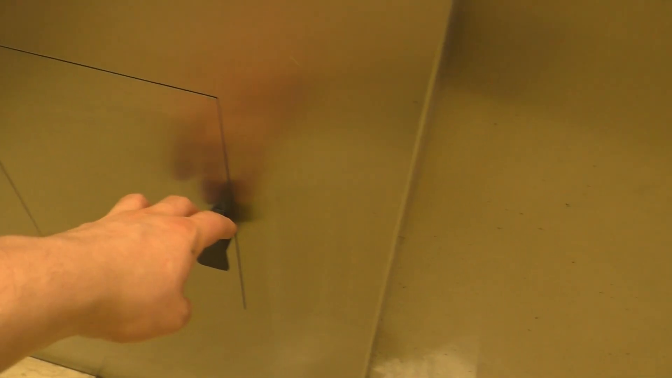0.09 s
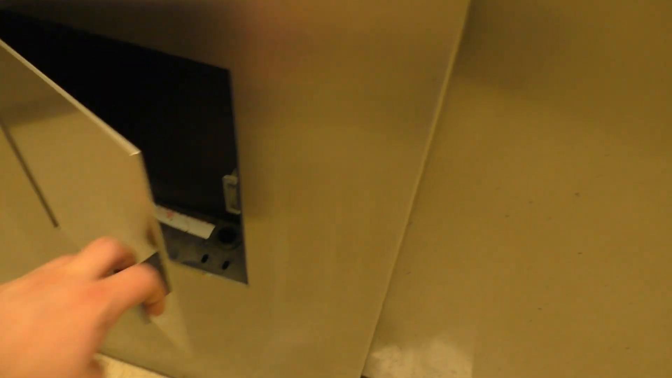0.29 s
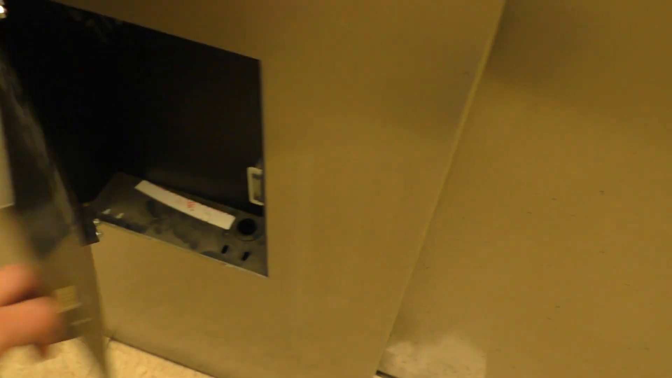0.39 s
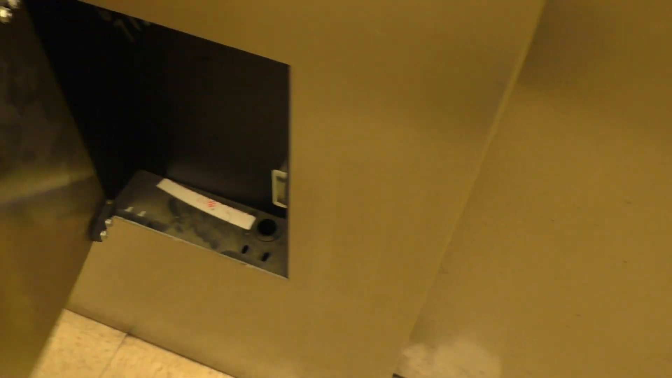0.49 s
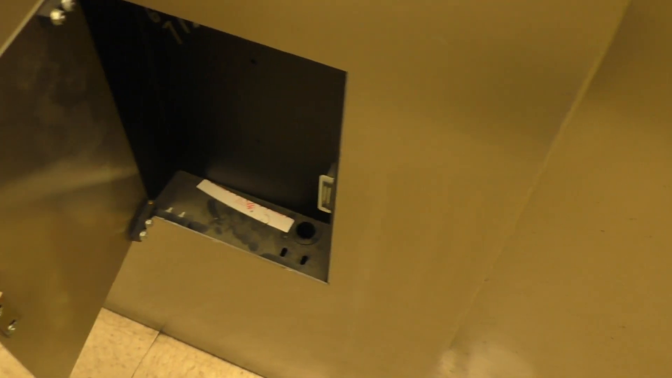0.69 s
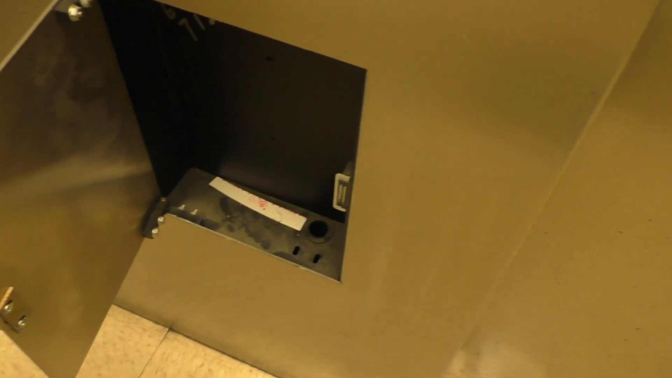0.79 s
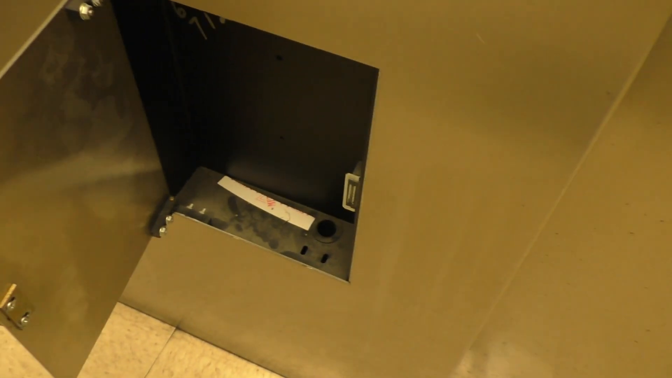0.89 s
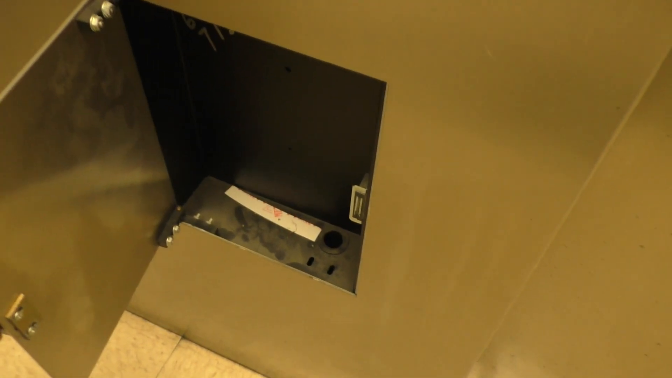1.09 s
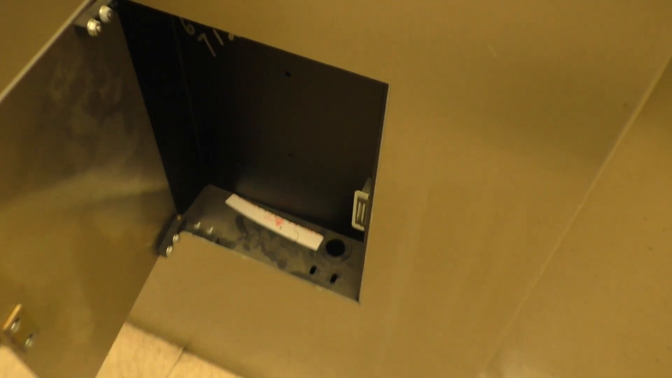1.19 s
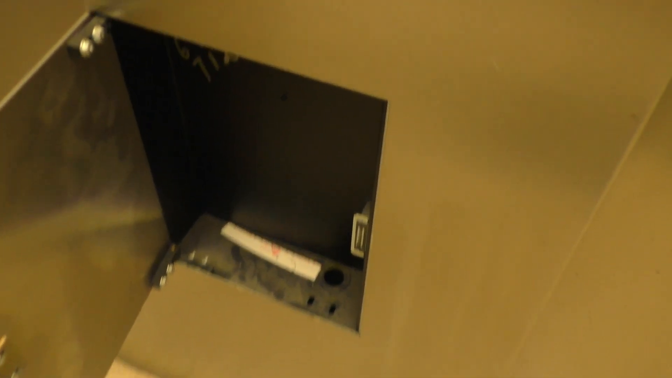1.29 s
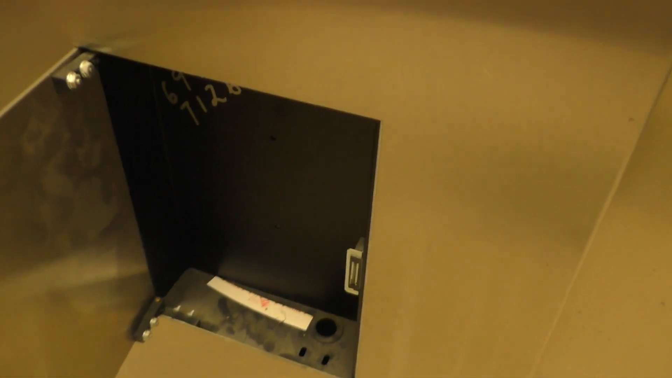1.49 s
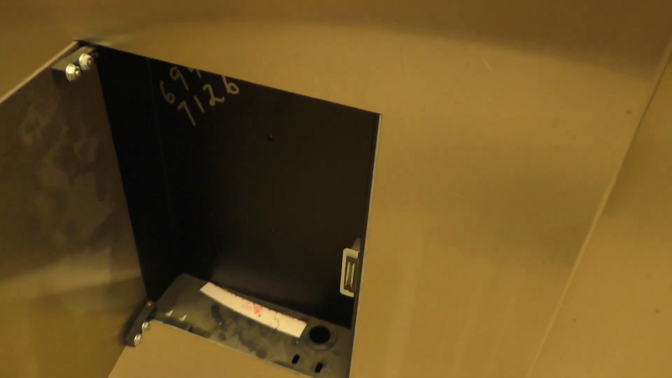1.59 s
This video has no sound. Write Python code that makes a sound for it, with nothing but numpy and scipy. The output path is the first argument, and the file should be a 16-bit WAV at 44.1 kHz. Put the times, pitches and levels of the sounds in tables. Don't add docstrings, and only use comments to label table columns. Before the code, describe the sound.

Close hand-held stereo inside a small steel elevator car: faint hand rub, catch click, one heavy sheet-metal bang with rapid slaps, a boomy rebound, a sharp clack, then ringing fades into quiet machine hum.

```python
import sys
import numpy as np
from scipy import signal
from scipy.fft import rfft, irfft, next_fast_len
from scipy.io import wavfile
from scipy.ndimage import map_coordinates

SR = 44100
rng = np.random.default_rng(int(sys.argv[2]) if len(sys.argv) > 2 else 0)


def to_linear_factor(level_db):
    exponent = np.asarray(level_db, float) / 20
    return 10 ** exponent


def dump(signal):
    limited = np.clip(np.atleast_2d(signal).T, -1, 1)
    pcm = np.round(limited * 32767).astype(np.int16)
    wavfile.write(sys.argv[1], SR, pcm)


N = 70560
T = np.arange(N) / SR


def unit(x):
    return x / np.sqrt(np.mean(x ** 2) + 1e-20)


def along(points, hz):
    f, v = np.transpose(points)
    return np.interp(np.log(hz + 1), np.log(f + 1), v)


def wobble(rate):
    knots = rng.standard_normal(int(N * rate / SR) + 4)
    return map_coordinates(knots, [np.arange(N) * rate / SR])


def add(into, x, s):
    k = round(s * SR)
    into[:, k:] += x[:, :N - k]


def rush(tone, alike, shape=lambda hz, t: 1):
    hz, t, z = signal.stft(rng.standard_normal((2, N)), SR, nperseg=256, noverlap=192)
    z = z * shape(hz[:, None], t)
    pair = signal.istft(z, SR, nperseg=256, noverlap=192)[1][:, :N]
    m = next_fast_len(N + 8192)
    f = np.fft.rfftfreq(m, 1 / SR)
    gain = to_linear_factor(along(tone, f))
    turn = np.arccos(np.clip(along(alike, f), -1, 1)) / 2
    mid, side = irfft(rfft(pair, m) * gain * [np.cos(turn), np.sin(turn)], m)[:, :N]
    return np.array([mid + side, mid - side]) / np.sqrt(np.mean(gain ** 2))


# pitch_hz, left_right_likeness
MODE_ALIKE = [(110, 1), (280, 0.11), (460, .8), (1000, 0.89), (3000, 0.73)]
FLUTTER_DB, FLUTTER_PER_S = 1.5, 15
WANDER, BLUR_HZ = .003, 700


def mode(hz, t60, attack):
    crowd = 1 + hz / BLUR_HZ
    likeness = np.clip(along(MODE_ALIKE, hz), -1, 1)
    turn = np.arccos(likeness) / 2 * np.array([[1], [-1]])
    pitch = hz * (1 + WANDER * wobble(FLUTTER_PER_S * crowd))
    phase = 2 * np.pi * (np.cumsum(pitch) / SR + rng.random())
    flutter_db = FLUTTER_DB * np.sqrt(crowd) * wobble(FLUTTER_PER_S * crowd)
    return to_linear_factor(flutter_db - 60 * T / t60) * (1 - np.exp(-T / attack)) * np.sin(phase + turn)


# pitch_hz, t60_s
RING = [(80, 1.14), (300, 1.2), (1000, 0.93), (3000, 0.56), (8000, 0.59), (15000, 0.24)]
# pitch_hz, rise_s
SWELL = [(100, 0.051), (700, 0.029), (2500, 0.0059), (8000, 0.0016)]
# pitch_hz, left_right_likeness
HIT_ALIKE = [(80, 0.27), (280, 0.41), (600, 0.66), (2000, 0.79), (6000, 0.33), (14000, .4)]
GRAIN_DB, GRAIN_PER_S, GRAIN_FROM_HZ = 1.5, 300, 1500


def blows(hits, tone, modes, ring_db, slower):
    out = np.zeros((2, N))

    def attack(hz):
        return abs(slower) * along(SWELL, hz) + 1e-4

    for s, db, share in hits:
        grain_db = GRAIN_DB * wobble(GRAIN_PER_S)

        def wash(hz, t):
            chatter_db = hz / (hz + GRAIN_FROM_HZ) * np.interp(t, T, grain_db)
            fade_db = chatter_db - 60 * t / (share * along(RING, hz))
            return to_linear_factor(fade_db) * (1 - np.exp(-(t + 0.011) / attack(hz)))

        x = rush(tone, HIT_ALIKE, wash)
        for hz, level_db, t60 in modes:
            x = x + to_linear_factor(ring_db + level_db) * mode(hz, t60 * share, attack(hz))
        add(out, to_linear_factor(db) * x * np.minimum(T / 0.0009, 1), s)
    return out


UNEVEN_DB = 1.5

# pitch_hz, level_db
HUM_TONE = [(12, -21), (20, 0.5), (119, -6.5), (146, -10.5), (256, -17), (325, -21), (363, -21.5),
            (406, -27.5), (900, -29.5), (1170, -54.5), (1980, -120)]
# pitch_hz, left_right_likeness
HUM_ALIKE = [(30, 0.15), (200, 0.59), (900, 0.79)]
# pitch_hz, level_db
HISS_TONE = [(290, -17), (500, 8), (570, -4), (1890, -11.5), (11300, -12.5), (15800, -8.5), (16500, -39)]
# pitch_hz, level_db
WHINE = [(253.0, -64), (360.7, -63.5), (10966, -77.5), (11693, -86)]
HUM_DB, HISS_DB = -49.5, -65.5


def car():
    lumps_db = UNEVEN_DB * wobble(15)
    balance_db = np.array([[-1.3], [1.3]])
    out = to_linear_factor(HUM_DB + lumps_db + balance_db) * rush(HUM_TONE, HUM_ALIKE)
    for hz, db in WHINE:
        out = out + to_linear_factor(db + 0.5 + UNEVEN_DB * wobble(1)) * np.sin(2 * np.pi * hz * T)
    return out + to_linear_factor(HISS_DB) * rush(HISS_TONE, [(1000, 0.32), (12000, .1)])


# start_s, level_db
RUB = [
    (0, -49.5),
    (0.062, -50),
    (0.1, -48),
    (0.2, -52),
    (0.235, -42),
    (0.301, -64),
    (1.2, -68.5),
    (1.4, -64.5),
    (1.6, -64.5),
]
# pitch_hz, level_db
RUB_TONE = [(180, -39), (300, 2), (486, -16), (589, 0), (660, -8.5), (1100, -6), (14000, -26)]


def hand():
    s, db = np.transpose(RUB)
    grain_db = UNEVEN_DB * wobble(60)
    return to_linear_factor(np.interp(T, s, db) + grain_db) * rush(RUB_TONE, HIT_ALIKE)


# start_s, level_db
SWAYS = [
    (0, -45),
    (.07, -45),
    (.17, -38),
    (1.17, -45.5),
    (1.32, -43.5),
]
SWAY_HZ, SWAY_S = 34.3, 0.023


def sways():
    out = np.zeros((2, N))
    swing = np.sin(2 * np.pi * SWAY_HZ * T) * T / SWAY_S * np.exp(1 - T / SWAY_S)
    for s, db in SWAYS:
        add(out, to_linear_factor(db) * swing * np.ones((2, 1)), s)
    return out


# start_s, level_db, pitch_hz, width_octaves, t60_s
CLICKS = [
    (0.222, -32.5, 507, 1.2, 0.39),
    (0.1097, -26, 5990, 4.9, .012),
    (0.233, -29, 4540, 1.6, 0.046),
    (0.243, -38.5, 5000, 1.9, 0.028),
    (0.369, -42.5, 9000, 1.5, 0.028),
    (0.5788, -26, 3630, 0.2, 0.012),
    (0.5791, -28, 6300, 0.77, 0.02),
    (0.583, -49, 12000, 0.69, 0.019),
    (0.605, -58, 12000, 0.74, 0.035),
    (0.616, -50, 3000, 0.97, .015),
          (.886, -58, 3800, .8, .03),
    (1.138, -62, 980, .5, .1),
    (.07, -55, 7000, 1.2, .08),
    (.195, -54, 3500, .8, .04),
]


def clicks():
    out = np.zeros((2, N))
    for s, db, hz, octaves, t60 in CLICKS:
        band = [(hz * 2. ** (k * octaves), -12 * k * k) for k in (-2, -1, -.5, 0, .5, 1, 2)]
        burst = np.minimum(T / 0.0012, 1) * rush(band, [(1000, 0.87)])
        add(out, to_linear_factor(db - 60 * T / t60) * burst, s)
    return out


# start_s, level_db, pitch_hz, t60_s
PINGS = [(.58, -31, 2729, 0.16), (.5788, -31.5, 5500, .015), (.5788, -35, 2400, 0.017),
         (.1099, -37, 1540, .015), (.1099, -39, 2300, .015), (.5788, -21, 3480, .035),
         (.5788, -29.5, 5700, 0.014), (.5788, -32, 6700, 0.02), (.5788, -37, 3000, 0.017),
         (.2323, -33.5, 4800, 0.027), (.2323, -26, 2900, 0.019), (.2348, -24.5, 2500, 0.026),
         (.248, -26, 2600, 0.044), (.27, -28, 2400, .08), (.295, -29, 2550, .1), (.3, -25, 1300, .1),
         (.245, -22, 295, .25), (.614, -36, 3500, .02), (.1099, -40, 5000, 0.017)]


def pings():
    out = np.zeros((2, N))
    for s, db, hz, t60 in PINGS:
        add(out, to_linear_factor(db - 60 * T / t60) * np.sin(2 * np.pi * hz * T) * np.ones((2, 1)), s)
    return out


# start_s, level_db, ring_share
POP = [(0.1101, -39.5, 1)]
# pitch_hz, level_db
POP_TONE = [(88, -33), (150, 3), (300, -1.5), (500, -9.5), (1210, -17), (3700, -14), (5150, -26),
            (6770, -17), (16000, -41)]
# pitch_hz, level_db, t60_s
CATCH = [(2686, -30, .2), (3440, -27, .7), (3800, -31, .4), (4124, -30, .6), (6105, -33, .5),
         (6557, -30, .3), (7230, -32, .5), (7930, -35, .4)]


def pop():
    return blows(POP, POP_TONE, CATCH, ring_db=15.0, slower=0.25)


FLEX_DB, FLEX_FROM_HZ, FLEX_TO_HZ, FLEX_S = -42.5, 330, 195.6, 0.0444


def flex():
    out = np.zeros((2, N))
    hz = FLEX_TO_HZ + (FLEX_FROM_HZ - FLEX_TO_HZ) * np.exp(-T / FLEX_S)
    swing = np.sin(2 * np.pi * np.cumsum(hz) / SR + np.array([[.4], [-.4]]))
    fade_db = FLEX_DB - 60 * T / .5 + 2 * UNEVEN_DB * wobble(60)
    add(out, to_linear_factor(fade_db) * swing, POP[0][0])
    return out


# start_s, level_db
BUMPS = [
    (0.119, -39),
    (0.222, -30.5),
    (0.301, -27),
    (1.162, -43.5),
    (1.407, -35),
    (1.521, -39.5),
]


def bumps():
    out = np.zeros((2, N))
    push = np.sin(2 * np.pi * 115 * T) * T / 0.021 * np.exp(1 - T / 0.01)
    for s, db in BUMPS:
        add(out, to_linear_factor(db) * push * to_linear_factor([[1], [-1]]), s)
    return out


# start_s, level_db, ring_share
BANG = [(0.2322, -14, 0.96)]
# pitch_hz, level_db
BANG_TONE = [(35, -64), (60, -14.5), (287, -10), (390, -21), (470, -13.5), (698, -9), (1380, -18.5),
             (8710, -39), (14200, -51.5), (16000, -101)]
# pitch_hz, level_db, t60_s
PANEL = [(111.4, 0, 0.77), (180.5, -10.5, 0.48), (242, 0.5, 0.5), (283, 5.5, 0.74), (462.8, 8, 0.36),
         (508.3, -6.5, 1), (612, -9, 0.91), (674, 0.5, 0.72), (705.5, 1.5, 0.66), (812, -6.5, 0.91),
         (914, -13, 0.94), (1000, -3.5, 0.78), (1205, -11, 0.65), (1261, -3, 0.66)]
# pitch_hz, level_db, t60_s
RAIL = [(1457, -12, .5), (1848, -7, 0.23), (2044, -15, 0.37), (2538, -12, 0.35), (2750, -15, 0.46),
        (4800, -22, 0.05)]


def bang():
    return blows(BANG, BANG_TONE, PANEL + RAIL, ring_db=-4.5, slower=0.95)


# peak_time_s, peak_db, push (positive) or pull (negative)
RATTLE = [(.243, -6.5, -0.92), (0.2516, -12, 0.89), (.2645, -16.5, 1), (.2747, -4.5, 1), (.28, -8.5, -1.3),
          (0.2849, -7.5, 0.69), (.298, -5.5, -1.26), (0.3049, -12.5, -1.4), (.371, -12, 1),
          (.3805, -8, -1.05), (.392, -17, 0.63)]
RATTLE_HZ, RATTLE_S = 800, .0007
CRACK_DB, CRACK_HZ, CRACK_S = -20, 2580, 0.01


def rattle():
    out = np.zeros((2, N))
    peak_s = 3 * RATTLE_S
    slap = np.exp(-(T / RATTLE_S - 3) ** 2 / 2) * np.cos(2 * np.pi * RATTLE_HZ * (T - peak_s))
    edge = [(CRACK_HZ / 4, -30), (CRACK_HZ, 0), (CRACK_HZ * 3, -14), (CRACK_HZ * 6, -40)]
    for s, db, sign in RATTLE:
        crack = to_linear_factor(CRACK_DB - 60 * T / CRACK_S) * unit(rush(edge, [(1000, 0.82)]))
        add(out, to_linear_factor(db - 4.0) * (sign * slap + crack), s - peak_s)
    return out


# start_s, level_db, pitch_hz, t60_s
TAPS = [(1.075, -56, 815, .2), (.585, -40, 820, .15), (.755, -38, 178, .6), (.755, -50, 1685, .4),
        (.262, -21, 700, .3), (.585, -41, 490, .3), (.72, -46, 800, .4), (1.137, -52, 1080, .06),
        (1.12, -57, 830, .15), (.395, -28, 250, .4), (.34, -27, 288, .5)]


def taps():
    out = np.zeros((2, N))
    for s, db, hz, t60 in TAPS:
        add(out, to_linear_factor(db) * mode(hz, t60, 0.0027), s)
    return out


# start_s, level_db, ring_share
REBOUND = [(0.366, -26, 0.91)]
# pitch_hz, level_db
REBOUND_TONE = [(35, -20), (60, -2), (272, -18), (390, -12.5), (520, -10), (773, -7), (1450, -30.5),
                (1870, -28.5), (15500, -45.5)]
# pitch_hz, level_db, t60_s
LEAF = [(80, -3.5, 1), (123.6, 5.5, 0.69), (284.4, -1.5, 0.88), (662, -4, 0.25), (845, -8, 0.67),
        (1178, -2, 0.46)]


def rebound():
    return blows(REBOUND, REBOUND_TONE, LEAF, ring_db=-3.5, slower=.4)


# start_s, level_db, ring_share
CLACK = [(0.579, -33, 0.99)]
# pitch_hz, level_db
CLACK_TONE = [(880, -12), (1500, -16.5), (2770, -6), (2970, -6), (3520, -9), (8830, -24.5), (13800, -37),
              (16000, -76)]
# pitch_hz, level_db, t60_s
LATCH = [(1384, -10, .6), (1873, -8, .3), (2035, -6, .22), (2562, -11, .6), (2729, -5, .5), (2853, -11, .3),
         (3246, -14, .45), (3386, -4, .18), (4050, -10, .55), (4274, -10, .6), (5580, -5, .3),
         (5660, -12, .4), (6551, -12, .35), (7569, -20, .4)]


def clack():
    return blows(CLACK, CLACK_TONE, LATCH, ring_db=-2, slower=0.32)


# start_s, level_db, ring_share
THUD = [(0.611, -31.5, 0.81)]
# pitch_hz, level_db
THUD_TONE = [(47, -52), (80, -2.5), (185, -7.5), (1100, -9.5), (1710, -9.5), (4970, -33), (5760, -22),
             (12000, -44), (15600, -85), (22000, -120)]
# pitch_hz, level_db, t60_s
HATCH = [(135, -5, .4), (181, 2, .65), (199, -4, .6), (288, -8, .6), (492, -10.5, 1.3), (820, -11, .9),
         (1384, -15, .45), (1685, -8.5, .7), (2164, -20, .4)]


def thud():
    return blows(THUD, THUD_TONE, HATCH, ring_db=3.0, slower=0.11)


def scene():
    left_db = np.array([[1], [-1]])
    wall = pings() + clicks() + pop() + bang() + rattle() + rebound()
    latch = clack() + thud()
    hits = wall * to_linear_factor(0.18 * left_db) + latch * to_linear_factor(0.12 * left_db)
    return car() + hand() + sways() + flex() + bumps() + taps() + hits


def band_limit(x):
    return signal.sosfilt(signal.butter(12, 16640, fs=SR, output="sos"), x)


EDGE_HZ, EDGE_DB, TOP_HZ = 15800, -9, 16450


def record(dry):
    m = next_fast_len(N + 8192)
    hz = np.fft.rfftfreq(m, 1 / SR)
    response = to_linear_factor(EDGE_DB * (hz > EDGE_HZ)) * (hz < TOP_HZ)
    mix = irfft(rfft(dry, m) * response, m)[:, :N]
    return band_limit(mix)


dry = scene()
out = record(dry)
dump(out)
```